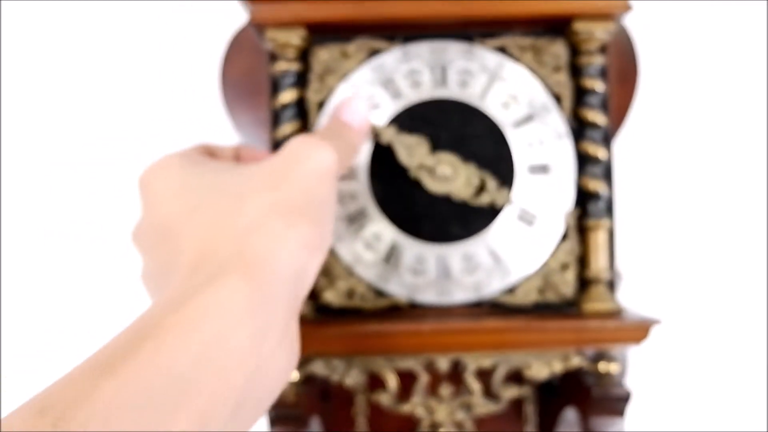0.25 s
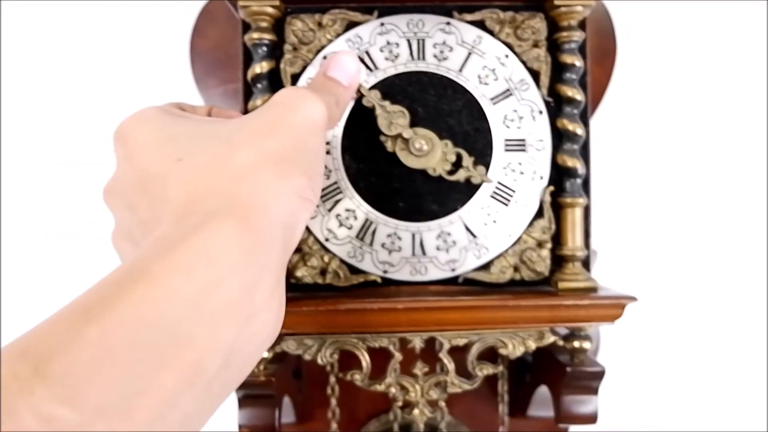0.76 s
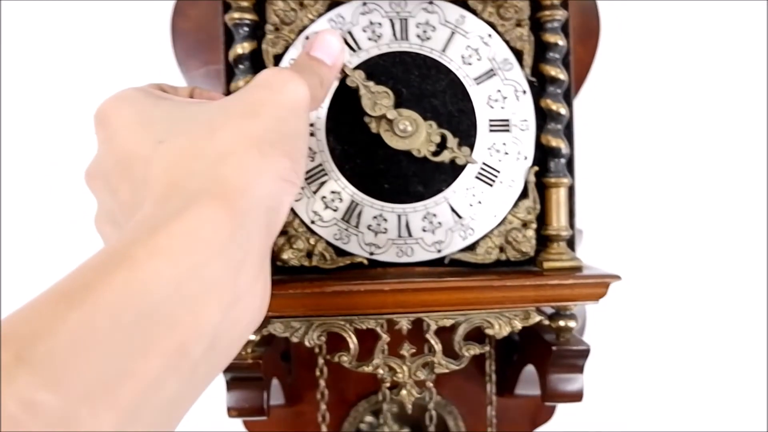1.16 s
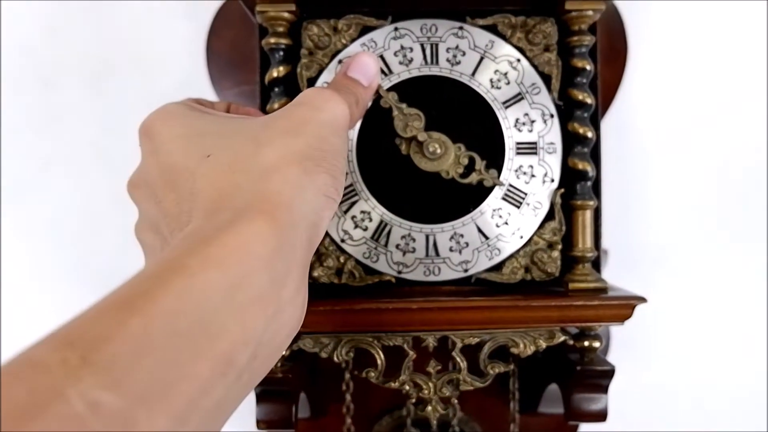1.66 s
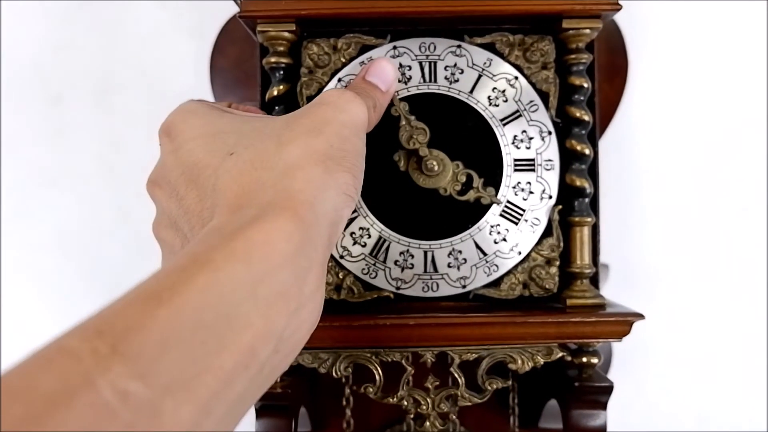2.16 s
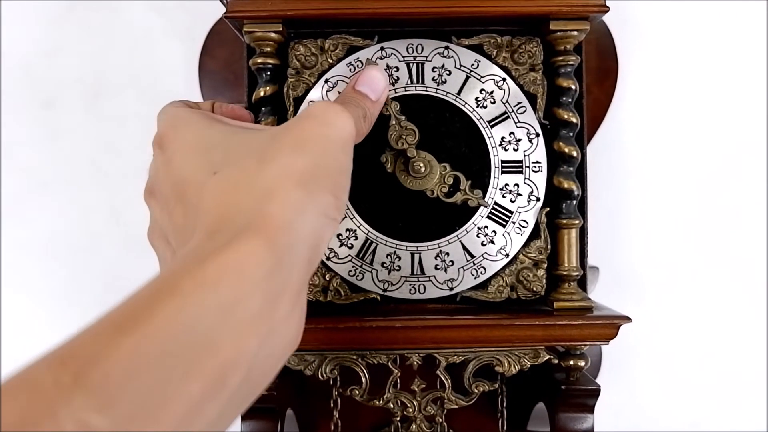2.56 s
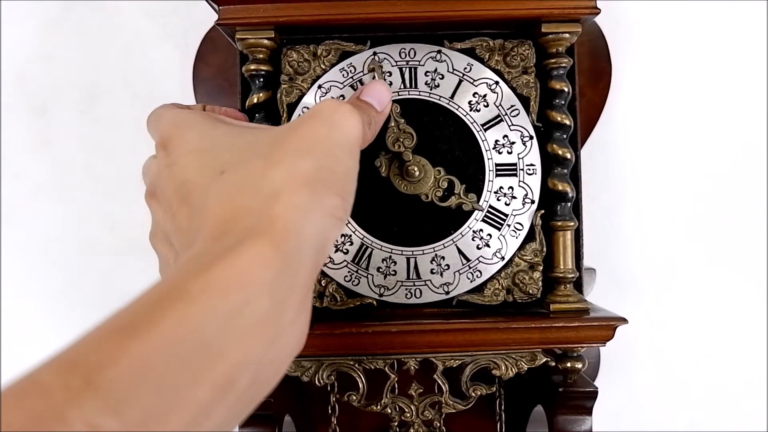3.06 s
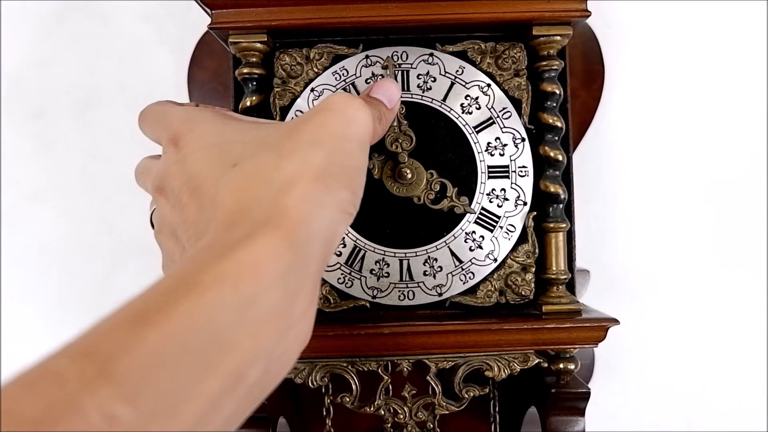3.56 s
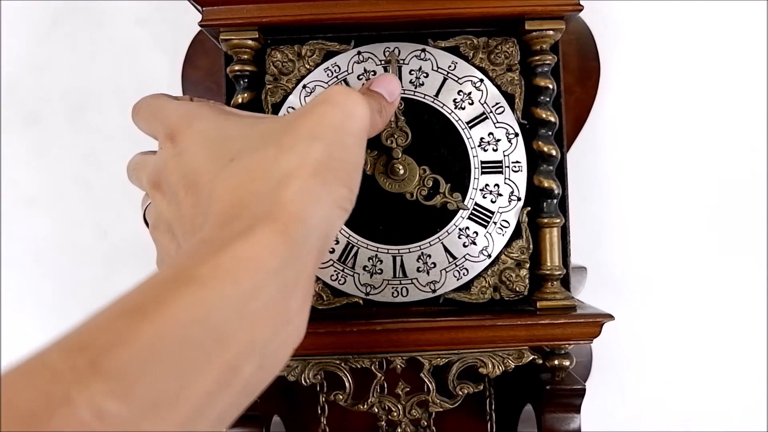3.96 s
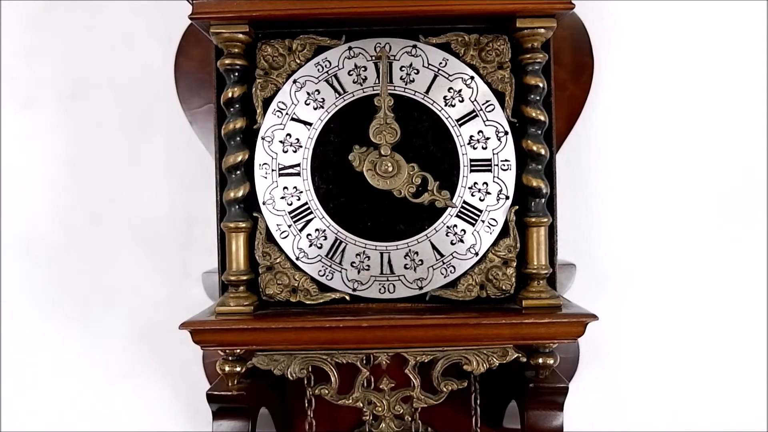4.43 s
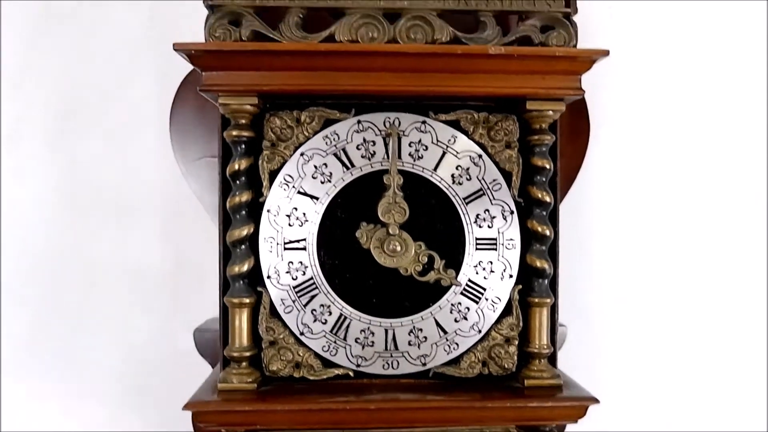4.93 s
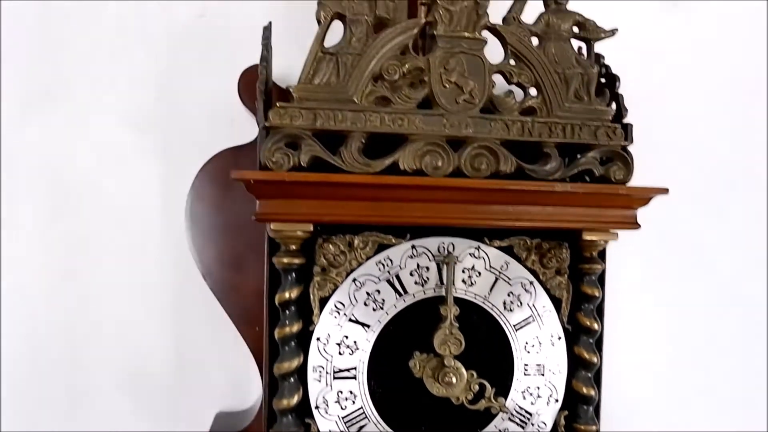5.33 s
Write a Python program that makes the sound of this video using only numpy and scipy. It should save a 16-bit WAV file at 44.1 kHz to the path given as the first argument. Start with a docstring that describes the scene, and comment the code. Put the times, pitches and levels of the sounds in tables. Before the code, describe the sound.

A control on the camera snaps sharply four times right beside the microphone, amid soft bumps and swishes of the grip. Much quieter, a mechanical wall clock ticks about twice a second in a still room. As a finger pushes the minute hand forward, levers knock lightly inside the wooden case, then one drops with a short rattling clunk. The faint ticking carries on over low hiss.

```python
"""A quiet room with a weight-driven wall clock; a finger pushes the minute hand up to the hour.
The escapement ticks, strike levers knock in the wooden case and one drops with a rattling clunk.
Early on, a control on the camera snaps four times right beside the microphones, amid soft
bumps and swishes of the grip, and the gain control ducks the room."""
import sys
import numpy as np
from scipy import signal
from scipy.fft import rfft, irfft, next_fast_len
from scipy.io import wavfile
from scipy.ndimage import uniform_filter1d, minimum_filter1d

SR = 44100
rng = np.random.default_rng(int(sys.argv[2]) if len(sys.argv) > 2 else 0)


def transcribe(signal):
    """Save signal, clipped to [-1, 1], as a 16-bit WAV file at the path in sys.argv[1]."""
    frames = np.atleast_2d(signal).T
    limited = np.clip(frames, -1, 1)
    pcm = np.round(limited * 32767).astype(np.int16)
    wavfile.write(sys.argv[1], SR, pcm)


N = 246519
TIME_S = np.arange(N) / SR
AGE_S = TIME_S[:SR // 2]  # time since a contact

# room air and microphone hiss (frequency [Hz], relative level [dB])
AIR_COLOUR = [(15, -46), (25, -24), (55, -13), (114, -5.5), (285, -2.5), (326, -7.5), (439, -10),
              (714, -12), (1100, -15.5), (1260, -15), (3080, -20), (4140, -19.5), (8830, -28.5),
              (14800, -30), (16000, -30.5)]
# stereo width of the air (frequency [Hz], side minus mid [dB])
AIR_WIDTH = [(60, -7.5), (300, -5), (1000, -2.5), (2600, -2.5), (5000, -0.5), (12000, -0.5)]
# room drones and a hiss band (centre [Hz], level [dB], bandwidth [Hz])
DRONES = [(62.8, -69, 14), (290.7, -67, 3), (4160, -72, 640)]

# grip bumps (time [s], level [dB], t60 [s])
GRIP_BUMPS = [(0.004, -52, 0.26), (0.0551, -40.5, 0.029), (0.595, -56, 0.03), (0.642, -58, 0.058)]
# bump spectrum (frequency [Hz], relative level [dB])
GRIP_COLOUR = [(40, -23), (130, -11), (210, 4), (400, 0), (850, -11), (1500, -9), (4000, -30), (16000, -50)]
# finger slides on the camera, later on the dial (centre time [s], level [dB], half-length [s])
FINGER_SLIDES = [(0.020, -46, 0.056), (0.339, -47.5, 0.037), (0.419, -45.5, 0.058), (0.6, -52.5, 0.036),
                 (0.65, -43.5, 0.014), (0.694, -46, 0.026), (0.801, -39.5, 0.013), (0.926, -42.5, 0.013),
                 (1.083, -51, 0.016), (3.552, -58, 0.043), (4.15, -58, 0.04)]
# slide and crackle spectrum (frequency [Hz], relative level [dB])
FRICTION_COLOUR = [(300, -23), (1200, -11), (2500, -0.5), (3600, -8.5), (4400, -2), (6000, -14.5),
                   (8000, -8), (11000, -15), (16000, -15.5)]
# camera body (frequency [Hz], level [dB], t60 [s], left minus right [dB], left lead [rad])
SHELL_MODES = [(190, -37, 0.05, 20, 4.5), (830, -20, 0.035, -6, 7.5), (1315, -17, 0.012, 17, 4.5),
               (1993, -8.5, 0.019, -3, 1), (2346, -9, 0.011, 6.5, 2), (2640, -8, 0.014, -6.5, 1.5),
               (3040, -23.5, 0.033, -12, 2.9), (3190, -24.5, 0.024, -20, 0.5), (4290, -3, 0.01, -1.5, 2.0),
               (5217, -3.5, 0.012, 16, -3), (7020, -1, 0.013, -5, 3), (7390, -15, 0.0087, -22.5, 3.5),
               (8320, -9, 0.011, -13.5, 3), (9500, -30, 0.017, -26.5, 5), (10570, -20.5, 0.019, -13, 6),
               (11700, -17, .003, 21, -5.5), (13200, -16, .003, 12, -19), (15100, 4.5, 0.0036, 9.5, -2.5)]
# four loud snaps, one faint
# (time [s], level [dB], corner [Hz], catch lead [s], catch re snap [dB], rebound corner [Hz])
CONTROL_SNAPS = [(0.1075, 2.5, 7600, 0.0044, -18, 2880), (0.7157, 3, 11300, 0.0046, -5, 2180),
                 (0.8825, 3, 8100, 0.0064, -18, 4140), (1.1214, 3.5, 8900, 0.001087, 1, 1940),
                 (1.35, -30, 2500, 0.0016, -30, 1980)]

# escapement beats (time [s], level [dB])
BEATS = [(0.0762, -44), (0.5450, -41), (1.033, -41.5), (1.5040, -40.5), (1.9860, -43), (2.4501, -42.5),
         (2.9400, -41), (3.4088, -42.5), (4.374, -45), (4.854, -43), (5.3250, -45)]
# tick and tock pallets (mode build-up [cycles], tilt [dB/octave])
PALLET_TONES = [(6.9, 3), (4.1, 1)]
# brass movement (frequency [Hz], level [dB], t60 [s])
BRASS_MODES = [(1272, -9.5, 0.34), (1285.3, 7.5, 0.1), (1454, -8.5, 0.15), (1890, -15, 0.16),
               (2150, -21.5, 0.27), (2350, -15, 0.058), (2520, -27, 0.045), (2601, -3.5, 0.084)]
# movement rattle (frequency [Hz], relative level [dB])
BRASS_COLOUR = [(300, -32), (900, -4), (1300, 6.5), (1600, -6.5), (2700, 2.5), (3150, -10), (4200, -13),
                (8000, -56), (16000, -31)]
# wooden case (frequency [Hz], level [dB], t60 [s])
CASE_MODES = [(461, -12.5, 0.54), (628, -10.5, 0.22), (712, -10.5, 0.24), (854, -5.5, 0.16),
              (1018, -9, 0.14), (1074, -7, 0.11), (1459, -14, 0.18), (1664, -10.5, 0.16), (2130, -13, 0.21),
              (2230, -12, 0.13), (2495, -4, 0.093), (2998, -13.5, 0.19), (3930, -17, 0.12),
              (5290, -15.5, 0.093), (6180, -15, 0.074), (6830, -19, .09), (7600, -20, 0.1),
              (8580, -16, .08)]
# crack of the case (frequency [Hz], relative level [dB])
CRACK_COLOUR = [(100, -9), (350, -20), (650, 8.5), (1300, -4), (1850, -1.5), (2700, -2.5), (3500, -14),
                (5500, -7), (8600, -7.5), (9500, -21), (16000, -40)]
# thud of the back board (frequency [Hz], relative level [dB])
BOARD_COLOUR = [(60, -26), (160, -11), (330, -11), (450, 1.5), (650, -16), (1200, -14.5), (8000, -45)]
# lever knocks (time [s], level [dB], corner [Hz], brass re knock [dB], thud re knock [dB])
LEVER_KNOCKS = [(1.4730, -51, 4470, 2, -26), (2.1440, -43, 4800, -8.5, -5.5), (2.3640, -53.5, 4000, -10, 1),
                (2.5270, -54, 1500, -10, 4), (3.0978, -46.5, 2820, -9, 5), (3.1390, -51.5, 3000, -2, 4),
                (4.2830, -59, 3200, -7, -15), (5.4430, -50.5, 2010, -18, 2)]

# stereo widths (frequency [Hz], side minus mid [dB])
CRACKLE_WIDTH = [(2500, -14), (5000, -9)]
BRASS_WIDTH = [(500, -26), (5000, -14)]
CASE_WIDTH = [(500, -24), (3000, -13), (9000, -4)]


def undb(db):
    """Decibels to gain."""
    return 10 ** (np.asarray(db) / 20)


def add(out, time_s, sound):
    """Mix a stereo sound in from time_s."""
    start = max(int(time_s * SR), 0)
    out[:, start:start + sound.shape[1]] += sound[:, :N - start]


def bin_gains(spectrum, size):
    """Gain of a spectrum table at each FFT bin."""
    hz, db = np.transpose(spectrum)
    bins_hz = np.fft.rfftfreq(size, 1 / SR)
    return undb(np.interp(np.log(bins_hz + 1), np.log(hz), db))


def noise(colour, width, size=len(AGE_S)):
    """Coloured stereo noise, mid rms 1."""
    fft_size = next_fast_len(size, True)
    mid_bins, side_bins = rfft(rng.standard_normal((2, fft_size))) * bin_gains(colour, fft_size)
    mid = irfft(mid_bins, fft_size)[:size]
    side = irfft(side_bins * bin_gains(width, fft_size), fft_size)[:size]
    return np.array([mid + side, mid - side]) / mid.std()


def decay(t60_s):
    """Exponential decay after a blow."""
    return undb(-60 * AGE_S / t60_s)


def soften(x, corner_hz, q=0.85):
    """Springy contact: a resonant low-pass."""
    warped_rate = 0.5 / np.tan(np.pi * min(corner_hz / SR, 0.45))
    b, a = signal.bilinear([1], [1, 1 / q, 1], fs=warped_rate)
    return signal.lfilter(b, a, x)


def ring(modes, build_cycles, spread_rad, tilt_db_per_oct=0):
    """Modes swell, high ones first; reflections put the two channels slightly out of phase."""
    out = 0
    for k, (hz, db, t60_s) in enumerate(modes):
        gain = undb(db + tilt_db_per_oct * np.log2(hz / modes[0][0]))
        swell = 1 - np.exp(-(AGE_S * hz / build_cycles) ** 2)
        phase_rad = k * np.pi + spread_rad * rng.standard_normal((2, 1))
        out = out + gain * swell * decay(t60_s) * np.sin(2 * np.pi * hz * AGE_S + phase_rad)
    return out


def room(air_db=-52.5):
    """Steady air and hiss with wavering narrow-band drones."""
    fft_size = next_fast_len(N, True)
    bins_hz = np.fft.rfftfreq(fft_size, 1 / SR)
    out = undb(air_db) * noise(AIR_COLOUR, AIR_WIDTH, size=N)
    for hz, db, bandwidth_hz in DRONES:
        resonance = 1 / (1 + (2 * (bins_hz - hz) / bandwidth_hz) ** 2)
        drone = irfft(rfft(rng.standard_normal(fft_size)) * resonance, fft_size)[:N]
        out += undb(db) * drone / drone.std()
    return out


def grip_bumps():
    """Dull thumps as the grip on the camera shifts."""
    out = np.zeros((2, N))
    for time_s, db, t60_s in GRIP_BUMPS:
        add(out, time_s, undb(db) * decay(t60_s) * noise(GRIP_COLOUR, AIR_WIDTH))
    return out


def finger_slides(ridges=115, grain_db=2.0, grain_samples=32):
    """Skin ridges rub past in grainy swishes; a quicker slide is brighter."""
    out = np.zeros((2, N))
    for centre_s, db, half_s in FINGER_SLIDES:
        steps = np.repeat(rng.standard_normal(len(AGE_S)), grain_samples)[:len(AGE_S)]
        swell = np.exp(-2 * ((AGE_S - 2 * half_s) / half_s) ** 2)
        swish = soften(noise(FRICTION_COLOUR, AIR_WIDTH), ridges / half_s)
        add(out, centre_s - 2 * half_s, undb(db + grain_db * steps) * swell * swish)
    return out


def snap_contacts(catch_hz=2710, scrapes=4, scrape_db=-19.5, stop_q=1.32,
                  rebound_s=0.0006, rebound_db=-3.5):
    """Catch slips, scrapes; control hits its stop, rebounds (time [s], level [dB], corner [Hz], Q)."""
    for time_s, db, stop_hz, lead_s, catch_db, rebound_hz in CONTROL_SNAPS:
        yield time_s - lead_s, db + catch_db, catch_hz, 2.9
        for share in rng.random(scrapes):
            yield time_s - share * lead_s, db + scrape_db, catch_hz, stop_q
        yield time_s, db, stop_hz, stop_q
        yield time_s + rebound_s, db + rebound_db, rebound_hz, 3.2


def camera_snaps(crackle_db=-31, echo_db=-57):
    """Snaps cross the camera shell; each microphone gets its own level and phase of every mode."""
    out = np.zeros((2, N))
    pan = np.array([[0.5], [-0.5]])
    shell = sum(undb(db + pan * pan_db) * decay(t60_s) * np.sin(2 * np.pi * hz * AGE_S + pan * lead_rad)
                for hz, db, t60_s, pan_db, lead_rad in SHELL_MODES)
    tail = undb(crackle_db) * decay(t60_s=0.026) + undb(echo_db) * decay(t60_s=0.25)
    for time_s, db, corner_hz, q in snap_contacts():
        click = soften(shell, corner_hz, q)
        crackle = soften(tail * noise(FRICTION_COLOUR, CRACKLE_WIDTH), corner_hz)
        add(out, time_s, undb(db) * (click / np.abs(click).max() + crackle))
    return out


def escapement(beat_s=0.477, slide_s=0.0045, rattle_db=-0.5, turn_away_s=4, blur_per_s=3.8):
    """Teeth slide onto the two pallets in turn; the brass ring builds over milliseconds."""
    out = np.zeros((2, N))
    envelope = decay(t60_s=0.13) * (1 - np.exp(-AGE_S / slide_s))
    for time_s, db in BEATS:
        build_cycles, tilt = PALLET_TONES[round(time_s / beat_s) % 2]
        build_cycles *= 1 + blur_per_s * max(time_s - turn_away_s, 0)  # slower as the camera turns away
        rattle = undb(rattle_db + tilt / 2) * envelope * noise(BRASS_COLOUR, BRASS_WIDTH)
        brass = ring(BRASS_MODES, build_cycles, spread_rad=0.057, tilt_db_per_oct=tilt)
        add(out, time_s, undb(db) * (brass + rattle))
    return out


def chatter(drop_s, drop_db, count=3, gap_s=0.0098, loss_db=1.9,
            corner_hz=5600, brass_db=-0.5, thud_db=-27):
    """The dropped lever rattles in its seat, each contact weaker; rows as LEVER_KNOCKS."""
    return [(drop_s + k * gap_s, drop_db - loss_db * k ** 2, corner_hz, brass_db, thud_db)
            for k in range(count)]


def bounces(drop_s, drop_db, count=2, flight_s=0.055, restitution=0.46,
            corner_hz=12500, brass_db=-26, thud_db=-11.5):
    """The lever bounces, each flight shorter and each landing softer; rows as LEVER_KNOCKS."""
    speeds = restitution ** np.arange(count)
    times_s = drop_s + flight_s * np.cumsum(speeds)
    levels_db = drop_db + 20 * np.log10(restitution * speeds)
    return [(time_s, db, corner_hz, brass_db, thud_db) for time_s, db in zip(times_s, levels_db)]


def strike_levers(drop_s=3.8797, drop_db=-30.3, echo_db=-22, build_s=0.0018):
    """Levers knock, one drops on the hour: a crack, case and brass ring, the back board thuds."""
    out = np.zeros((2, N))
    case = ring(CASE_MODES, build_cycles=5.1, spread_rad=0.11)
    # a heavy lever wakes mostly the lowest brass modes
    brass = ring(BRASS_MODES, build_cycles=3.6, spread_rad=0.13, tilt_db_per_oct=-9)
    attack = 1 - np.exp(-AGE_S / build_s)
    tail = decay(t60_s=0.095) + undb(echo_db) * decay(t60_s=0.48)
    contacts = LEVER_KNOCKS + chatter(drop_s, drop_db) + bounces(drop_s, drop_db)
    for time_s, db, corner_hz, brass_db, thud_db in contacts:
        crack = tail * noise(CRACK_COLOUR, CASE_WIDTH)
        thud = undb(thud_db) * decay(t60_s=0.15) * noise(BOARD_COLOUR, CASE_WIDTH)
        blow = attack * (crack + thud) + case + undb(brass_db) * brass
        add(out, time_s, undb(db) * soften(blow, corner_hz))
    return out


def scene():
    """Room, handling and clock."""
    return room() + grip_bumps() + finger_slides() + camera_snaps() + escapement() + strike_levers()


def gain_control(x, limit_db=-4.5, hold_s=0.084, release_db_per_s=16.5):
    """Peaks over the limit cut the gain at once; it holds, then climbs back steadily."""
    peak_db = 20 * np.log10(np.abs(x).max(axis=0) + 1e-9)
    over_db = np.maximum(peak_db - limit_db, 0)
    half_hold = int(hold_s * SR / 2)
    held_db = -minimum_filter1d(-over_db, 2 * half_hold + 1, origin=half_hold, mode="constant")
    climb_db = release_db_per_s * TIME_S
    cut_db = np.maximum.accumulate(held_db + climb_db) - climb_db
    return x * undb(-uniform_filter1d(cut_db, size=4))


def record(dry, top_hz=16100):
    """Camera gain control, then a steep low-pass."""
    low_pass = signal.ellip(10, 0.2, 70, top_hz, fs=SR, output="sos")
    return signal.sosfilt(low_pass, gain_control(dry))


dry = scene()
out = record(dry)
transcribe(out)
```